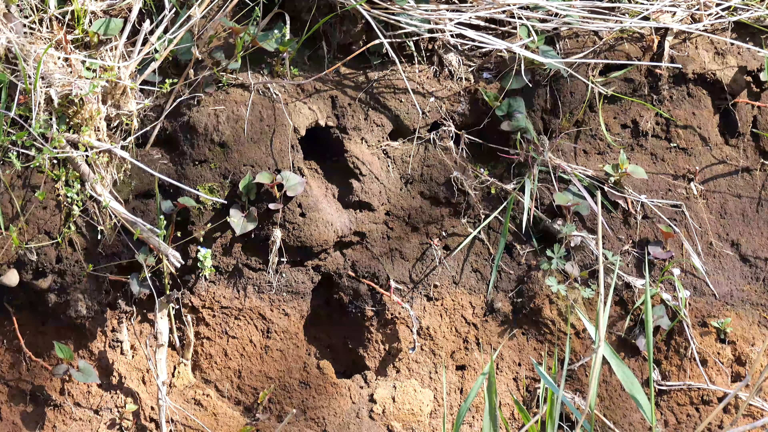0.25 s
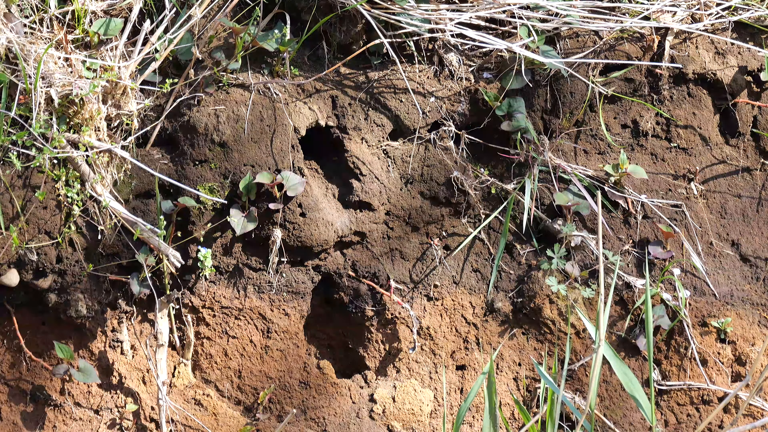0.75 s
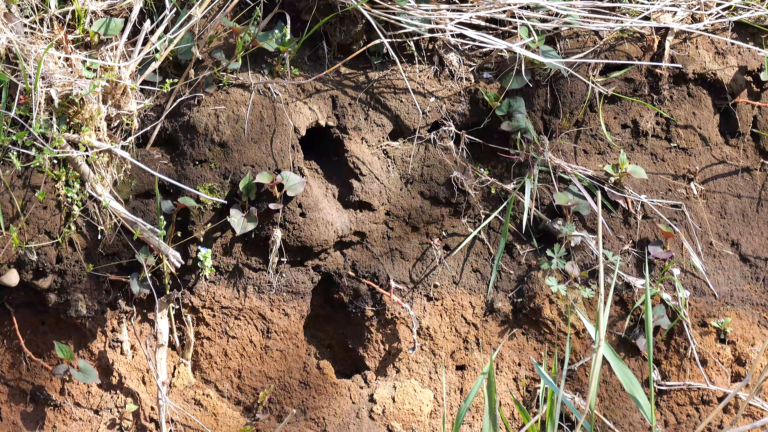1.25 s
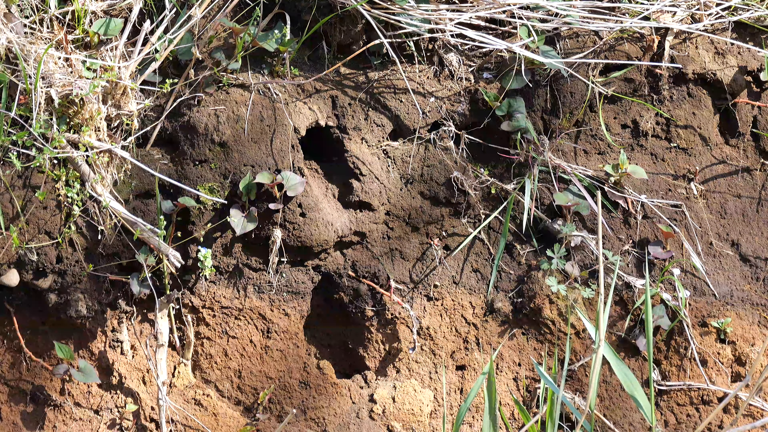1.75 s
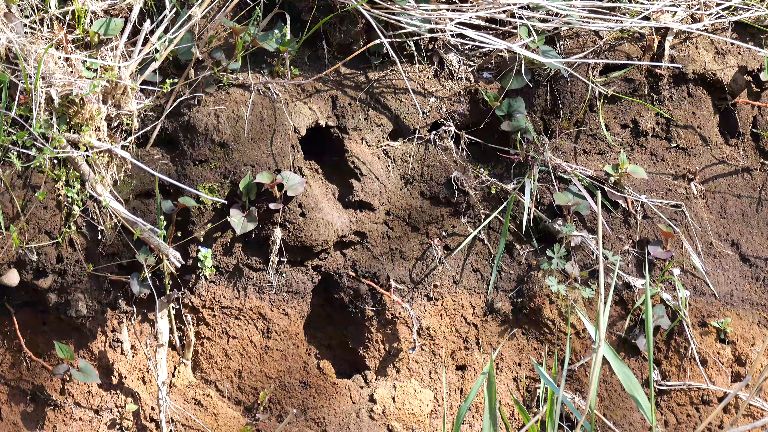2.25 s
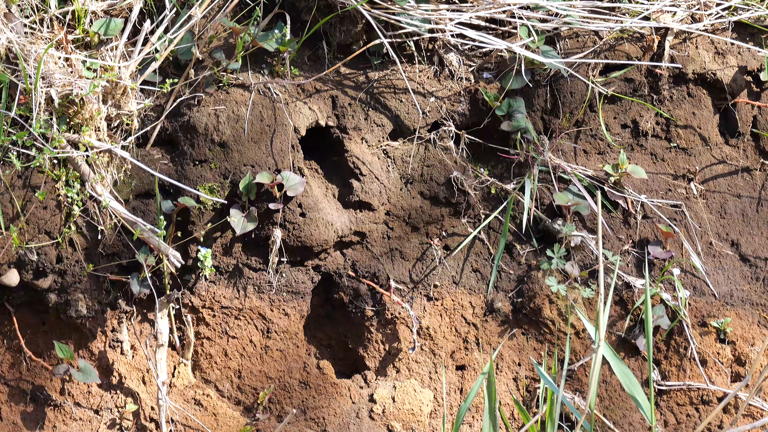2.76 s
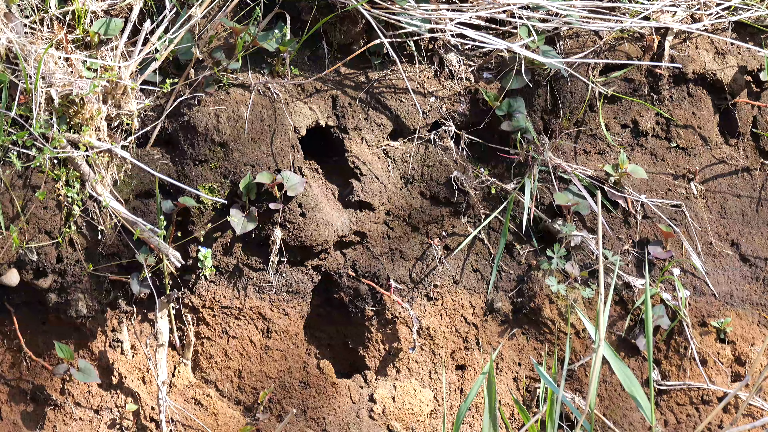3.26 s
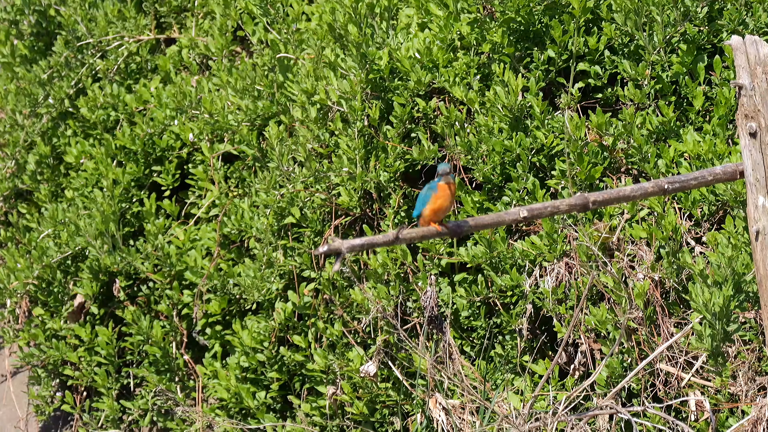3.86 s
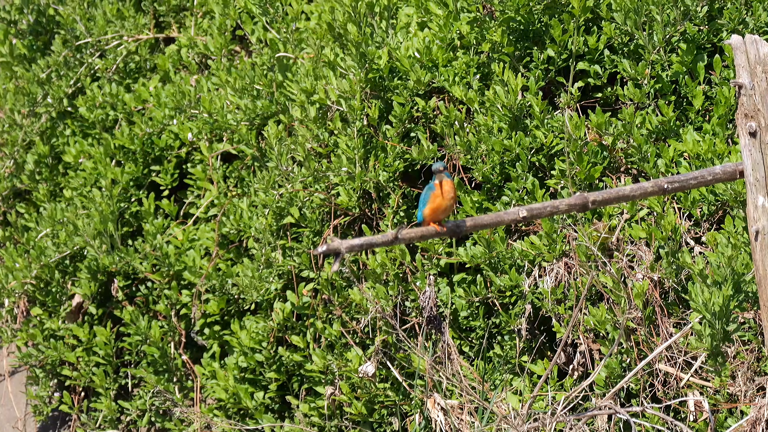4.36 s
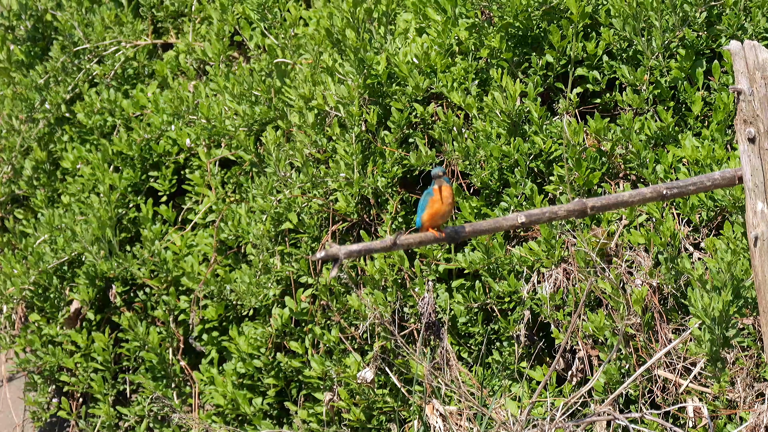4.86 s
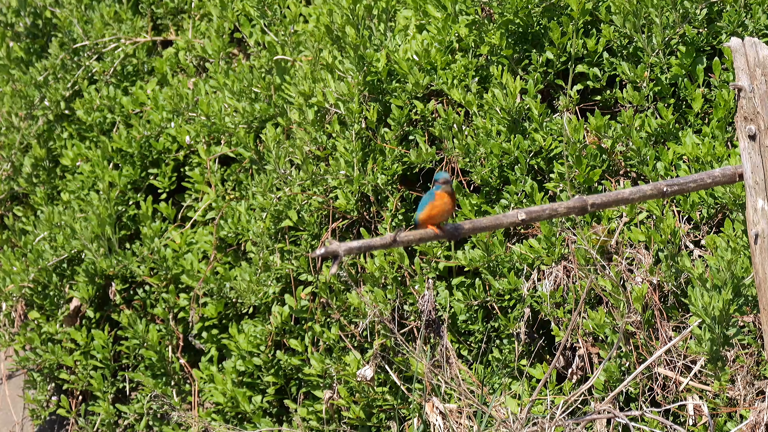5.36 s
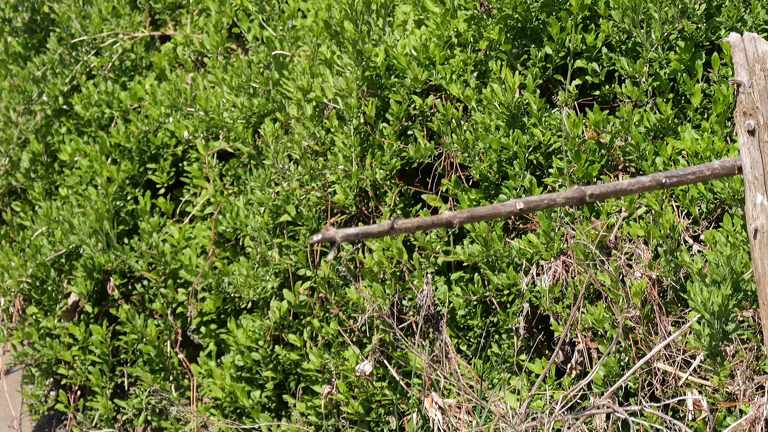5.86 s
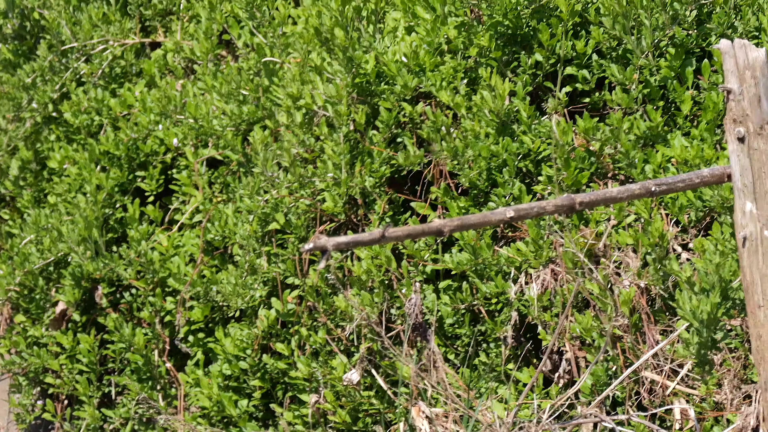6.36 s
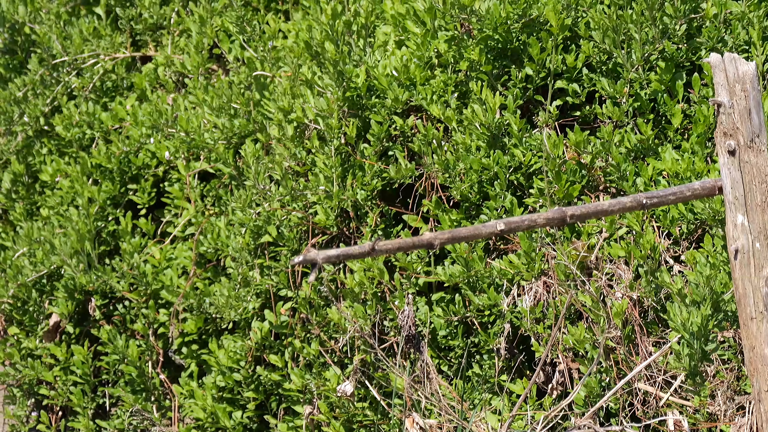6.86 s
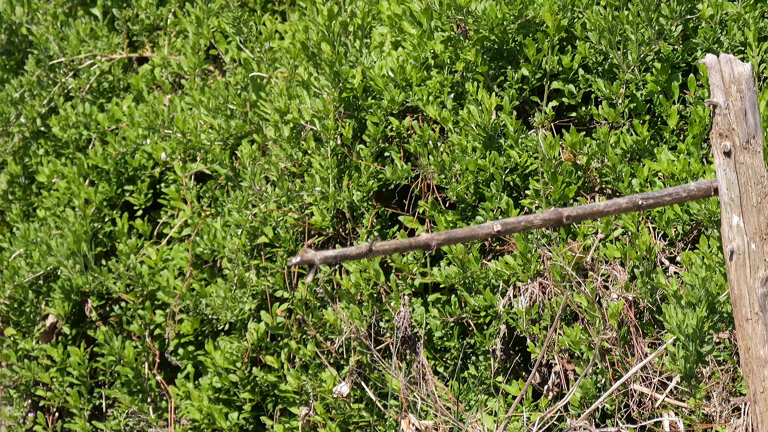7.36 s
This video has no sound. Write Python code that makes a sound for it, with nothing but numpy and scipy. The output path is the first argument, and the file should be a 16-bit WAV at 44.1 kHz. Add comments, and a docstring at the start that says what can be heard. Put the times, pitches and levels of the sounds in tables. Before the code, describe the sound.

A loud wash of road noise with rustling dry grass cuts off abruptly, leaving a low distant traffic rumble, chattering birds and sharp kingfisher whistles.

```python
"""A kingfisher whistles sharply on a river bank: nearly pure gliding tones with a faint octave.
Bulbuls slur, chatter and rasp further off in the bushes: gliding harmonics without a fundamental.
A twig snaps (bursts exciting damped modes) and something splashes lightly (enveloped noise).
Traffic is coloured noise with engine drones: a loud wash of tyre noise, with a brief rustle of dry
grass, stops abruptly and leaves a quieter rumble, in which most of the calls are heard."""
import sys
import numpy as np
from scipy import signal
from scipy.fft import rfft, irfft, next_fast_len
from scipy.io import wavfile
from scipy.ndimage import map_coordinates

SR = 44100
rng = np.random.default_rng(int(sys.argv[2]) if len(sys.argv) > 2 else 0)


def store_wav(level_fs):
    """Save 16-bit WAV to argv[1]."""
    pcm = np.round(np.clip(np.atleast_2d(level_fs), -1, 1) * 32767)
    wavfile.write(sys.argv[1], SR, pcm.T.astype(np.int16))


N = 335601
TIME = np.arange(N) / SR
CUT_S = 3.693  # the loud wash ends here
# left minus right level of the near road and of the far surroundings: f/Hz, difference/dB
ROAD_SIDE = [(200, 0), (370, -1), (670, -3), (1220, -7.5), (2220, -5), (4060, -4), (7420, -4), (13500, 0)]
FAR_SIDE = [(200, 0), (370, .5), (670, 1.5), (1220, 4.5), (2220, 2.5), (4060, .5), (13500, -.5)]
# shared by slurs and chatter: exponent of the ever faster fall in pitch, level gained over it
FALL_CURVE, FALL_GAIN_DB = 1.49, 1


def from_db(db):
    """Level is logarithmic: 20 dB is a factor of ten in amplitude."""
    return 10 ** (np.asarray(db) / 20)


def rms_one(x):
    """Normalization to unit mean power."""
    return x / np.sqrt(np.mean(x ** 2) + 1e-20)


def at_hz(points, hz):
    """Interpolation of a spectrum, linear in log frequency."""
    points = np.array(points)
    return np.interp(np.log(hz), np.log(points[:, 0]), points[:, 1])


def pan(side_db):
    """Intensity stereo: a level difference shared equally between left and right."""
    return from_db(np.array([[.5], [-.5]]) * side_db)


def drift(knots_per_s):
    """Random modulation: normal random knots of unit spread joined by straight lines."""
    knots = rng.standard_normal(4096)
    return map_coordinates(knots, [TIME * knots_per_s], order=1, mode="wrap")


def air_noise(spectrum, side=FAR_SIDE):
    """Diffuse field: coloured noise whose two channels are alike in the bass, less so in the treble."""
    # correlation of the two microphones: f/Hz, correlation
    likeness = [(30, .93), (65, .998), (150, .999), (280, .995), (610, .94), (1330, .72), (2900, .7),
                (6200, .76), (13500, .3)]
    size = next_fast_len(N)
    hz = np.maximum(np.fft.rfftfreq(size, 1 / SR), 1)
    common, apart = rfft(rng.standard_normal((2, size)))
    alike = np.clip(at_hz(likeness, hz), 0, 1)
    pair = np.sqrt(1 + alike) * common + np.sqrt(1 - alike) * apart * [[1], [-1]]
    # 18 dB per octave beyond either end of the given spectrum
    lowest, highest = spectrum[0][0], spectrum[-1][0]
    skirts = np.minimum(1, np.minimum(hz / lowest, highest / hz)) ** 3
    colour = skirts * from_db(at_hz(spectrum, hz))
    return rms_one(irfft(pair * colour * pan(at_hz(side, hz)), size)[:, :N])


def swells(rows):
    """Exponential growth and decay: the summed gain of bursts."""
    total = 0
    for peak_s, db, rise, fall in rows:
        total = total + from_db(db) * np.exp(-np.maximum((peak_s - TIME) / rise, (TIME - peak_s) / fall))
    return total


def bushes(x, echoes_per_s, early_db, early_s, tail_db, t60):
    """Reverberation: direct sound, early echoes from ground and branches, a tail from the far bank."""
    t = np.arange(SR // 2) / SR
    noise = rng.standard_normal((2, 3, len(t)))
    # part common to both channels, part separate
    early, late = noise[:, :1] + 0.5 * noise[:, 1:]
    arrives = rng.random(len(t)) < echoes_per_s / SR
    early = early * arrives * np.exp(-t / early_s) * (t > .003)
    late = late * from_db(-60 * t / t60) * (t > .02)
    # both energies are relative to the direct sound
    echoes = (from_db(early_db) * rms_one(early) + from_db(tail_db) * rms_one(late)) / np.sqrt(len(t))
    return x + signal.fftconvolve(x[None], echoes, axes=1)[:, :N]


def far_traffic():
    """Superposition of many remote sources: a slowly growing low rumble under an even, soft hush."""
    # spectra: f/Hz, relative level/dB
    rumble_spectrum = [(25, -46), (45, -32), (68, -18.5), (90, -8), (120, 0), (190, 0), (270, -4.5),
                       (320, -6.5), (350, -12), (600, -28)]
    hush_spectrum = [(60, -41), (200, -0.5), (450, 2), (900, -1), (1400, -6), (1850, -8.5), (2150, -11),
                     (2400, -8.5), (3700, -11), (5200, -16.5), (6500, -24.5), (9000, -35), (11000, -39),
                     (14000, -42)]
    # brief swells of the rumble: t/s, peak level/dB, rise/s, fall/s
    rumble_swells = [(4.15, -44.5, 0.044, 0.11), (6.15, -45, 0.048, 0.071)]
    level_at_cut_db, growth_db_per_s = -42.5, 0.7
    level = from_db(level_at_cut_db + growth_db_per_s * (TIME - CUT_S)) + swells(rumble_swells)
    rumble = level * from_db(1.4 * drift(13)) * air_noise(rumble_spectrum)
    hush = from_db(-46.0 + 0.065 * drift(3.0)) * air_noise(hush_spectrum)
    return rumble + hush


def engines(near):
    """Periodic sources: frequency-modulated sines that stand out for a while, on the near or far road."""
    # drones that swell and fade: middle t/s, half length/s (to 1/e), mean f/Hz, relative level/dB
    drones = [(0.147, 0.44, 206, -29.5), (0.244, 0.51, 146.5, -31.5), (.3, 0.59, 268.2, -30),
              (0.206, 0.45, 122, -47), (1.352, 1.1, 261.3, -35), (1.647, 0.17, 185.5, -36),
              (3, 2.26, 188.2, -34.5), (5.602, 3.4, 266.4, -52), (5.9, 1.47, 318.6, -50)]
    out = np.zeros(N)
    for middle, half, hz, db in drones:
        if (middle < CUT_S) == near:
            swell = np.exp(-((TIME - middle) / half) ** 2)
            phase = phase_of(hz * (1 + 0.01533 * drift(15)))
            out += from_db(db + 1.5 + 2 * drift(7.6)) * swell * np.sin(phase)
    return out


def near_traffic():
    """Incoherent addition of power: passing vehicles add to a stream of engine noise and tyre noise."""
    # spectra: f/Hz, relative level/dB
    throb_spectrum = [(25, -38), (42, -28), (55, -13), (72, -4), (90, 4), (130, -28)]
    rumble_spectrum = [(25, -41), (45, -35), (70, -16.5), (100, -6), (140, 1.5), (195, 1), (275, 1),
                       (370, -7), (600, -27.5)]
    roar_spectrum = [(200, -13), (420, 1), (600, -1), (950, -2.5), (1400, -7.5), (2200, -11.5), (3200, -21),
                     (5000, -65)]
    hiss_spectrum = [(1600, -8.5), (2700, -1), (3300, 0), (3900, 2), (4500, -1.5), (5400, -9.5),
                     (7000, -14), (9000, -22.5), (11000, -34.5), (14000, -44)]
    # vehicles: closest t/s, half duration/s (to 1/e of power),
    # power added to throb, rumble and roar, each relative to the steady stream/dB
    passes = [(.15, 0.84, 8, 4, 1), (3.28, 0.85, 10.5, -0.5, 0.5)]
    throb_db, rumble_db, roar_db, hiss_db = -59, -31, -32.5, -42  # the steady stream
    hiss_follows = 0.33  # share of the roar's lift in dB that the hiss takes
    power = 1
    for closest, half, *added_db in passes:
        passing = np.exp(-((TIME - closest) / half) ** 2)
        power = power + from_db(added_db)[:, None] ** 2 * passing
    throb_lift, rumble_lift, roar_lift = 10 * np.log10(power)
    throb = from_db(throb_db + throb_lift) * air_noise(throb_spectrum, ROAD_SIDE)
    rumble = from_db(rumble_db + rumble_lift + 0.97 * drift(11)) * air_noise(rumble_spectrum, ROAD_SIDE)
    roar = from_db(roar_db + roar_lift + 0.72 * drift(12)) * air_noise(roar_spectrum, ROAD_SIDE)
    hiss_level = from_db(hiss_db + hiss_follows * roar_lift + .5 * drift(21.1))
    return throb + rumble + roar + hiss_level * air_noise(hiss_spectrum, ROAD_SIDE)


def grass():
    """Friction noise: stalks brush together in grainy rustles, the driest blades add a brighter swish."""
    # rustles of stalks, swishes of blades: t/s, relative peak level/dB, rise/s, fall/s
    rustles = [(.3, -37, .09, 0.065), (.40, -33, 0.03, 0.059), (.50, -32.5, 0.059, 0.11),
               (.73, -39.5, 0.017, 0.15), (.79, -43, 0.0083, 0.027), (1.11, -39.5, .03, 0.04),
               (1.29, -37.5, 0.037, 0.036)]
    swishes = [(.15, -51.5, .2, 0.23), (.402, -41.5, 0.011, .03), (.49, -33, 0.028, 0.05),
               (.79, -54, .01, .02), (.94, -55, .015, .05), (1.28, -54, .02, .04)]
    # spectra: f/Hz, relative level/dB
    stalk_spectrum = [(1500, -5.5), (3000, -3), (3800, 5.5), (4600, 1.5), (5600, -8), (7500, -20),
                      (10000, -31), (14000, -44)]
    blade_spectrum = [(2000, -26), (4500, -12), (6000, 5), (6900, 3), (8200, -6), (11300, -16),
                      (14000, -29)]
    stalks = swells(rustles) * air_noise(stalk_spectrum, ROAD_SIDE)
    blades = swells(swishes) * air_noise(blade_spectrum, ROAD_SIDE)
    grain = from_db(2.2 * drift(400))
    return from_db(-1.0) * (stalks + blades) * grain


def splash():
    """Impact noise of a liquid: water slaps shut in three quick gulps, and spray patters down."""
    # slaps of water, showers of falling spray: t/s, peak level/dB, rise/s, fall/s
    slap_rows = [(6.096, -35.5, 0.021, 0.009), (6.115, -34, 0.0045, 0.011), (6.133, -39, 0.0041, 0.014)]
    shower_rows = [(6.05, -50.5, 0.082, 0.058), (6.18, -51, 0.062, 0.16)]
    # spectra: f/Hz, relative level/dB
    slap_spectrum = [(200, 2), (420, 7), (1000, -2), (1600, -10.5), (2500, -8), (4500, -43), (12000, -43)]
    spray_spectrum = [(1000, -27), (2500, 5), (3700, 11), (5200, 0), (7200, -2), (10000, -18), (14000, -23)]
    slaps = swells(slap_rows) * air_noise(slap_spectrum)
    patter = from_db(2.7 * drift(300))
    return slaps + swells(shower_rows) * air_noise(spray_spectrum) * patter


def twig():
    """Modal excitation: bursts of tearing fibres sound directly and ring the damped modes of the wood."""
    # cracks: t/s, relative level/dB, low-pass cut-off f/Hz
    cracks = [(4.881, -28.5, 1900), (4.8928, -32, 12000), (4.896, -28.5, 3400), (4.8985, -31, 2600)]
    # modes of the wood: f/Hz, relative level/dB, time to decay by 60 dB/s
    modes = [(620, -18, 0.036), (907, -12, 0.069), (1380, -21, 0.033), (2750, 0.5, 0.008),
             (3270, -2, 0.008), (4500, 2, 0.0042), (9050, -4, .0015)]
    force, ringing = np.zeros(N), np.zeros(N)
    for crack_s, db, cut_hz in cracks:
        burst = rng.standard_normal(400) * np.exp(-np.arange(400) / SR / 0.001)
        burst = signal.sosfilt(signal.butter(2, cut_hz, fs=SR, output="sos"), burst)
        first = int(crack_s * SR)
        force[first:first + len(burst)] += from_db(db) * burst / np.linalg.norm(burst)
    for k, (hz, db, t60) in enumerate(modes):
        radius, angle = from_db(-60 / (t60 * SR)), 2 * np.pi * hz / SR
        feedback = [1, -2 * radius * np.cos(angle), radius ** 2]
        # successive modes have opposite sign
        ringing += (-1) ** k * from_db(db) * signal.lfilter([0, np.sin(angle)], feedback, force)
    dry_snap = ringing + from_db(3) * force
    return from_db(-6.5) * bushes(dry_snap, echoes_per_s=4400, early_db=-4.5, early_s=.024,
                                  tail_db=-13, t60=0.32)


def note(start, length, edge_s):
    """Gating: the samples of one note, the time within it, and a gate with soft edges."""
    at = np.flatnonzero((TIME > start - edge_s) & (TIME < start + length + edge_s))
    t = TIME[at] - start
    gate = np.clip(1 + np.minimum(t, length - t) / edge_s, 0, 1) ** 2
    return at, np.clip(t, 0, length), np.sqrt(2) * gate  # a sine of RMS 1


def phase_of(hz):
    """Phase is the time integral of angular frequency."""
    return 2 * np.pi * np.cumsum(hz) / SR


def slur(start, rise, hold, fall, start_hz, top_hz, end_hz, db):
    """Frequency glide: a call climbs, holds and tumbles; returns its samples, pitch and gain."""
    rise_curve = 1.4  # it climbs quickly and levels off at its top
    scoop_share, scoop_s = 0.0403, 0.0044  # it opens with a small scoop from below
    onset_db, onset_s = 3.5, 0.0055  # it swells from this far down
    sag_db = 5.5  # level lost over the climb
    at, t, gate = note(start, rise + hold + fall, edge_s=0.0033)
    up = np.clip(t / rise, 0, 1)
    down = np.clip((t - rise - hold) / fall, 0, 1)
    hz = top_hz - (top_hz - start_hz) * (1 - up) ** rise_curve - (top_hz - end_hz) * down ** FALL_CURVE
    scoop = 1 - scoop_share * np.exp(-t / scoop_s)
    level_db = db - onset_db * np.exp(-t / onset_s) - sag_db * up + FALL_GAIN_DB * down
    return at, hz * scoop, gate * from_db(level_db)


def plunge(top_s, fall, top_hz, end_hz, db):
    """Rapid glide: a note flicks up, thins at the turn and plunges; returns its samples, pitch and gain."""
    rise_s, lift_share, onset_db = .009, 0.1985, 5  # the flick: length, share of pitch, weaker start
    turn_db, turn_s = 2, .004  # the dip in level at the top
    at, t, gate = note(top_s - rise_s, rise_s + fall, edge_s=.002)
    t = t - rise_s  # zero at the top
    before, down = np.clip(-t / rise_s, 0, 1), np.clip(t / fall, 0, 1)
    hz = top_hz * (1 - lift_share * before ** 2) - (top_hz - end_hz) * down ** FALL_CURVE
    turn = np.exp(-(t / turn_s) ** 2)
    return at, hz, gate * from_db(db - onset_db * before - turn_db * turn + FALL_GAIN_DB * down)


def arch(middle, length, top_hz, db, droop):
    """Parabolic glide: a short note highest and loudest mid-way; returns its samples, pitch and gain."""
    at, t, gate = note(middle - length / 2, length, edge_s=.006)
    off_top = (2 * t / length - 1) ** 2
    return at, top_hz * (1 - droop * off_top), gate * from_db(db - 5 * off_top)


def bulbuls():
    """Source and filter: the throat hides the fundamental of each call and passes the next harmonics."""
    # slurs: start t/s, rise/s, hold/s, fall/s, start f/Hz (before the scoop), top f/Hz, end f/Hz,
    # relative level of the second harmonic/dB, third relative to second/dB, waver as a share of pitch
    slur_rows = [ (3.167, 0.034, .002, .003, 1930, 2110, 2090, -41, -25, .008),
                 (3.208, .036, .004, .006, 1950, 2130, 2080, -41, -25, 0.005),
                 (3.46, 0.024, .003, .004, 2240, 2400, 2330, -47, -25, .008),
                 (3.725, 0.023, .01, .015, 2100, 2640, 2300, -52, -25, .014),
                 (3.843, 0.074, .008, 0.014, 2080, 2480, 2000, -41, -28, 0.0087),
                 (3.92, 0.083, .017, .03, 1900, 2540, 1750, -63, 2, 0.01),
                 (4.087, .013, 0.0019, .003, 2080, 2420, 2350, -45, -25, .02),
                 (4.109, 0.046, 0.011, 0.015, 2210, 2700, 1900, -47.5, -26, 0.013),
                 (4.272, 0.038, .004, 0.004, 2075, 2190, 2170, -44.5, -27, 0.014),
                 (4.33, .078, 0.0046, .02, 1950, 2530, 1790, -60.5, 0, 0.016),
                 (4.434, 0.058, 0.074, .022, 1915, 2260, 1680, -61.5, 11, 0.02),
                 (4.456, 0.085, 0.0091, .006, 1710, 1680, 1630, -49, -20, 0.019),
                 (4.492, 0.066, .003, .011, 2340, 2770, 1900, -53, -24, 0.014),
                 (4.734, 0.082, 0.0072, 0.013, 1800, 2520, 1950, -59.5, -0.5, .016),
                 (5.138, 0.12, .005, .015, 1500, 2640, 2400, -69, 3, 0.016),
                 (5.296, .035, 0.007, 0.012, 1660, 1800, 1750, -58, 2, 0.033),
                 (5.575, .1, .005, .015, 1550, 2580, 2400, -69, 2, .016),
                 (5.764, .006, 0.0018, 0.028, 1757, 1900, 1196, -46, -14, .02),
                 (6.213, 0.0136, .002, .003, 1850, 2350, 2300, -50, -22, .014),
                 (6.24, .062, .004, .008, 2500, 2860, 2700, -61, -25, .014),
                 (6.503, 0.021, .003, .003, 2080, 2150, 2130, -48, -25, 0.015),
                 (6.521, .014, .001, .002, 1440, 2120, 2150, -47, -10, .012),
                 (6.535, 0.14, 0.015, 0.03, 2150, 2706, 2320, -39, -26, 0.0063),
                 (6.73, .002, 0.001, 0.023, 2690, 2700, 1640, -54.5, 6.5, .016),
                 (6.753, 0.12, .005, .018, 2160, 2660, 2300, -59, -7, .018),
                 (6.765, 0.09, .004, 0.007, 1600, 2110, 2000, -50.5, -17, 0.024),
                 (7.328, 0.081, .004, .018, 1830, 2530, 2030, -52, -25, 0.012),
                 (7.525, .04, .005, .008, 1480, 1860, 1750, -55, -22, .012)]
    # chatter: t of the top/s, fall/s, top f/Hz, end f/Hz, relative level/dB
    chatter = [(3.952, 0.012, 2570, 1900, -44), (3.968, .004, 1600, 1450, -48),
               (3.979, 0.0094, 2500, 1900, -45), (4.002, 0.0096, 2280, 1710, -47),
               (4.022, .005, 2250, 1740, -44), (4.031, .012, 1490, 1400, -51),
               (4.043, 0.0087, 2050, 1650, -50), (4.182, 0.0054, 2150, 1840, -43),
               (4.194, 0.014, 2186, 1410, -46), (4.433, .012, 2400, 1820, -49),
               (4.597, 0.019, 2930, 2050, -48), (4.84, 0.02, 2390, 1690, -53),
               (5.694, 0.01, 2300, 1820, -53), (5.712, .012, 2050, 1790, -53),
               (6.051, .014, 2600, 2130, -48), (6.078, 0.011, 2520, 1900, -49),
               (6.144, .009, 2250, 1700, -55), (6.403, 0.0097, 2300, 1860, -46),
               (6.722, 0.025, 2370, 1450, -49), (6.843, 0.011, 2170, 1550, -47),
               (7.432, 0.0114, 2350, 1950, -51), (7.449, 0.0073, 2200, 2000, -54)]
    # hoarse rasps: middle t/s, length/s, top f/Hz, relative level/dB, droop at the ends as a share of
    # pitch, third and fourth harmonics relative to second/dB, waver as a share of pitch
    rasps = [(4.638, .045, 2160, -50, 0.12, -16, 0.042), (5.368, 0.076, 1987, -45, .12, -17, 0.064),
             (5.746, 0.048, 2013, -46.5, .12, -18, 0.03), (5.796, .028, 2390, -51, .08, -18, .03),
             (6.011, .09, 1965, -46, .24, -11.5, 0.019), (6.427, 0.038, 2120, -46.5, .06, -19, 0.045)]
    chatter_third_db, chatter_waver, usual_fourth_db = -21, .016, -20
    # the fourth harmonic fades above the top of the throat's range
    throat_top_hz, throat_db_per_octave = 7400, 50
    calls = [(*slur(*row), third_db, usual_fourth_db, waver) for *row, third_db, waver in slur_rows]
    calls += [(*plunge(*row), chatter_third_db, usual_fourth_db, chatter_waver) for row in chatter]
    calls += [(*arch(*row), upper_db, upper_db, waver) for *row, upper_db, waver in rasps]
    out, wander = np.zeros(N), drift(600)
    for at, hz, gain, third_db, fourth_db, waver in calls:
        phase = phase_of(hz * (1 + waver * wander[at]))
        throat_db = throat_db_per_octave * np.maximum(np.log2(4 * hz / throat_top_hz), 0)
        third = from_db(third_db) * np.sin(3 * phase)
        fourth = from_db(fourth_db - throat_db) * np.sin(4 * phase)
        out[at] += gain * (np.sin(2 * phase) + third + fourth)
    room = bushes(out, echoes_per_s=1100, early_db=-2, early_s=0.032, tail_db=-10, t60=0.7)
    return from_db(-2.0) * pan(-1.6) * room


def kingfisher():
    """Frequency modulation: nearly pure whistles flick to a top and bend away, with a slight tremor."""
    # whistles: start t/s, length/s, attack/s, start f/Hz, top f/Hz, end f/Hz, relative level/dB
    whistles = [(3.686, 0.17, .004, 5330, 5390, 5350, -60.5), (4.622, 0.14, .008, 5650, 5630, 5110, -43.5),
                (4.767, .055, .004, 5120, 5220, 5180, -47.5), (4.933, 0.07, .004, 5200, 5300, 5750, -55),
                (6.33, 0.063, .002, 5620, 5870, 5050, -35), (7.184, 0.054, 0.0046, 5520, 6340, 5360, -31.5),
                (7.366, 0.0356, .002, 5320, 5830, 5540, -34), (7.399, 0.037, .003, 5520, 5680, 5480, -38),
                (7.446, 0.035, .003, 5610, 5730, 5410, -28.5), (7.482, 0.07, .009, 5470, 5670, 5260, -29.5)]
    flick_s = 0.0027  # time constant of the glide from start to top
    onset_db, fade_db = 8, 11  # each swells from this far down, and fades by this much
    bend_curve = 1.9  # it bends ever faster towards its end pitch
    out, tremor, unsteady = np.zeros(N), from_db(2 * drift(130)), 1 + 0.0041 * drift(500)
    for start, length, attack, start_hz, top_hz, end_hz, db in whistles:
        at, t, gate = note(start, length, edge_s=0.0041)
        bend = (t / length) ** bend_curve
        hz = top_hz + (start_hz - top_hz) * np.exp(-t / flick_s) + (end_hz - top_hz) * bend
        phase = phase_of(hz * unsteady[at])
        gain = gate * from_db(db - onset_db * np.exp(-t / attack) - fade_db * bend) * tremor[at]
        out[at] += gain * (np.sin(phase) + from_db(-33) * np.sin(2 * phase))
    room = bushes(out, echoes_per_s=1000, early_db=-4.5, early_s=0.019, tail_db=-12.5, t60=0.7)
    return from_db(-3.0) * pan(-1.8) * room


def scene():
    """Linear superposition: the loud wash gives way at once to the calm bank; the rest is added."""
    loud = np.clip((CUT_S - TIME) / 0.0076, 0, 1)
    wash = near_traffic() + engines(near=True) + grass()
    calm = far_traffic() + engines(near=False)
    background = loud * wash + (1 - loud) * calm
    return background + splash() + twig() + bulbuls() + kingfisher()


def record(dry):
    """Band limitation: the sound opens over 3 ms and is cut steeply above 14.2 kHz."""
    opened = dry * np.minimum(TIME / .003, 1)
    return signal.sosfilt(signal.ellip(10, .1, 80, 14200, fs=SR, output="sos"), opened)


dry = scene()
out = record(dry)
store_wav(out)
```